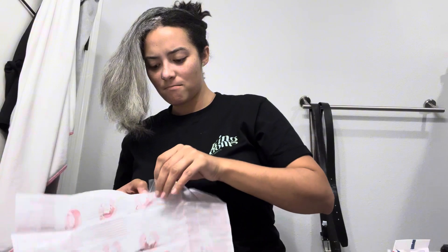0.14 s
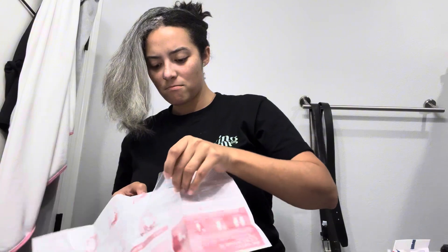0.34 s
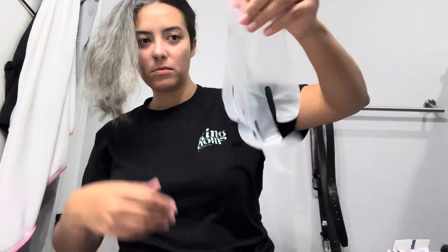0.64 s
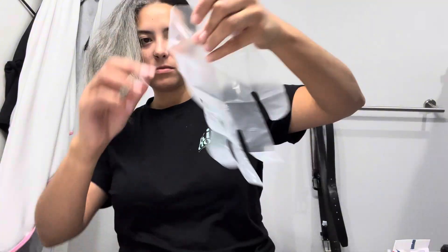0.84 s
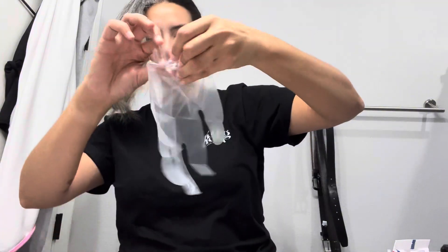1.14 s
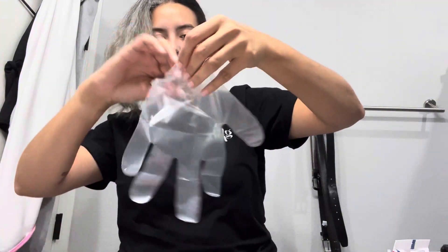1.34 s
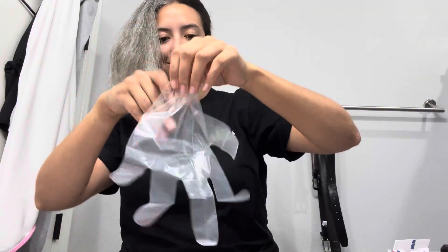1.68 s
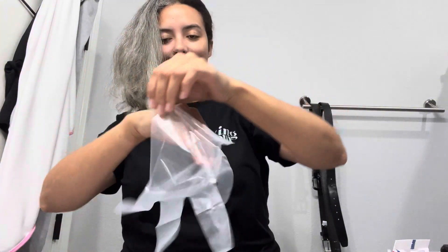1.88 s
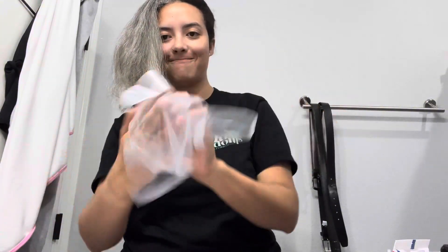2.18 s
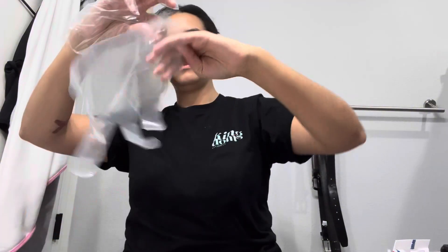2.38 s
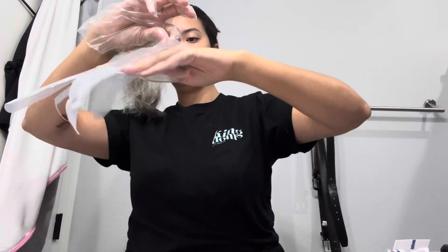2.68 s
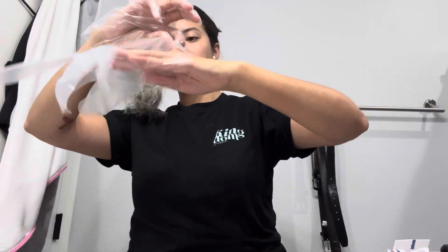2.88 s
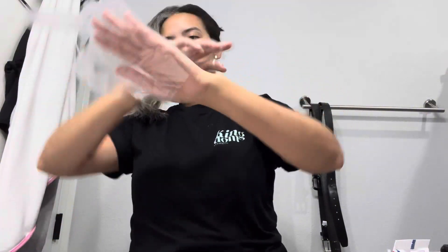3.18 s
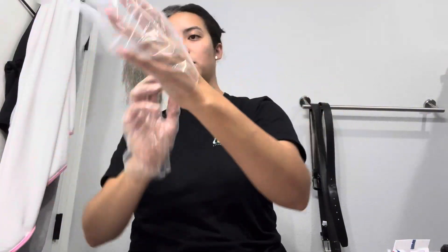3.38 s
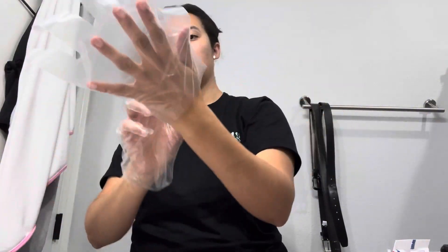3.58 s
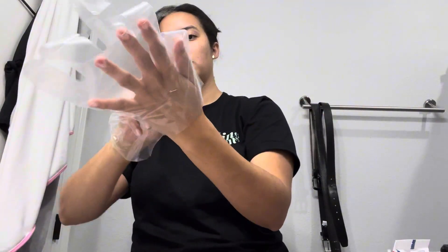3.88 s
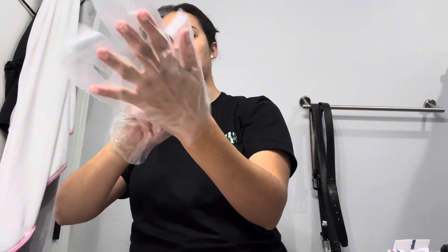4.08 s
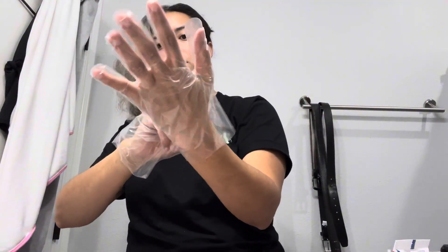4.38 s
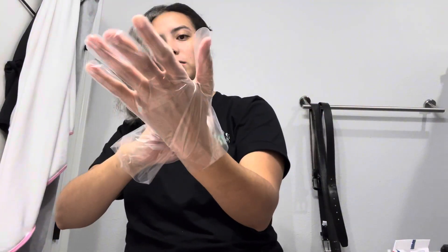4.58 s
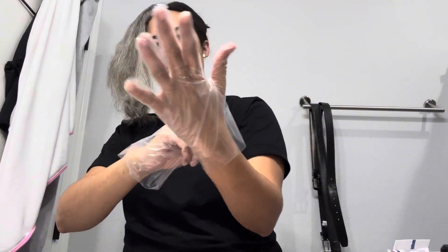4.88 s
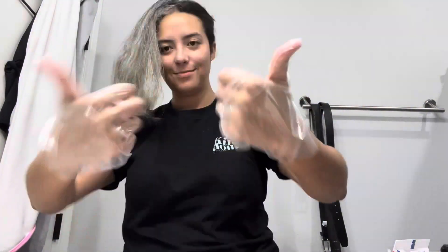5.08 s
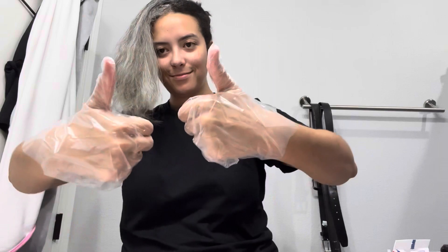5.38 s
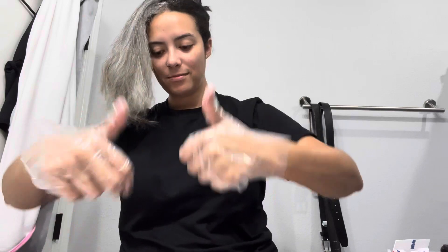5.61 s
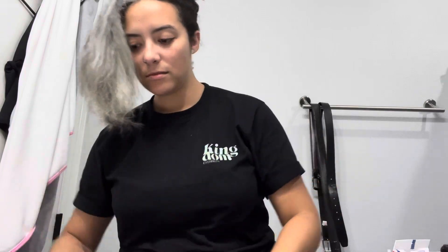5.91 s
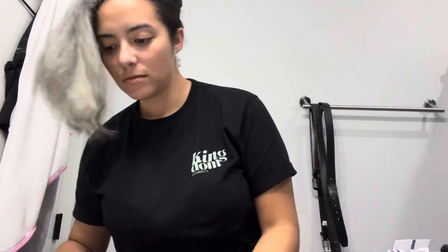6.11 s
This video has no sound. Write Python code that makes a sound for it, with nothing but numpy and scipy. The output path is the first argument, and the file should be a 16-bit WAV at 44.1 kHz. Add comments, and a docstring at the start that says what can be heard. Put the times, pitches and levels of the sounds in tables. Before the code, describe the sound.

In a small bathroom, close to the microphone, a folded paper leaflet is yanked open with loud, bright snaps and dull low flaps for just over half a second. Thin plastic gloves follow, much quieter, rustling and sizzling in uneven strokes with tiny clicks, thinning out near the end. A faint paper tap closes it. A low fan hum runs throughout.

```python
"""Paper crackles and snaps first: a folded leaflet is pulled open in a small bathroom.
Thin plastic gloves are then lifted off it and worked onto both hands, and the hands land on the paper again.
Creases buckle in swarms of tiny clicks that ring small facets; loud snaps are short bursts of slips.
The big sheet flaps as low noise and dull decaying sines, and wall echoes are decaying noise.
A ventilation fan hums throughout: unsteady sines over a dull rush of air."""
import sys
import numpy as np
from scipy import signal
from scipy.fft import rfft, irfft
from scipy.io import wavfile
from scipy.ndimage import uniform_filter1d

SR = 44100
rng = np.random.default_rng(int(sys.argv[2]) if len(sys.argv) > 2 else 0)


def to_wav(s):
    """Save 16-bit WAV."""
    ch = np.atleast_2d(s).T  # columns
    pcm = np.round(np.clip(ch, -1, 1) * 32767)  # PCM
    wavfile.write(sys.argv[1], SR, pcm.astype(np.int16))


N = 275625
TIME = np.arange(N) / SR

# Levels in the tables are starting points that the functions trim; colours are scaled to unit power.

# pulls that open the leaflet, then the hands landing on it again:
# [t/s, length/s, attack/s, crinkle level/dB, whole-sheet flexing level/dB]
PULLS = [(0.0, 0.26, 0.0045, -48, -43), (.078, 0.016, 0.012, -36.5, -37), (.16, 0.11, 0.0061, -41.5, -35),
         (.276, 0.09, 0.0026, -37, -34.5), (.365, 0.061, 0.0034, -33.5, -31.5),
         (.435, 0.073, 0.0068, -34.5, -33), (.568, 0.041, 0.0028, -44.5, -45),
         (6.175, 0.03, 0.025, -46, -40.5), (6.211, 0.014, 0.0051, -40.5, -35)]
# a pull slackens as the paper gives way, then dies out: the crinkle first, the flexing more slowly
PULL_SAG_DB_PER_S, PULL_RELEASE_DB_PER_S = 49, (228, 157)
# loud paper creases snapping through: [t/s, crack level/dB, tick level/dB]
PAPER_SNAPS = [(0.045, -38, -61), (0.102, -26, -32), (0.163, -29.5, -38), (0.174, -27.5, -45),
               (0.235, -29.5, -58), (0.277, -22, -31), (0.2845, -16.5, -22.5), (0.325, -23, -41),
               (0.3695, -16.5, -21), (0.437, -23, -35), (0.4788, -21.5, -31), (0.5712, -24.5, -23),
               (6.2115, -40, -34.5)]
# small stray paper snaps: [tries per s, crack and tick level/dB relative to the rustle, spread/dB]
PAPER_STRAYS = (89.5, -1.5, -3, 1)
# colour of the paper crinkle: [f/Hz, level/dB]
PAPER_COLOUR = [(300, -26), (700, 1), (1800, 5), (2500, 1.5), (3150, 7.5), (4100, 1.5), (5200, 7.5),
                (7800, 5), (11000, 1), (14200, 2), (16000, -10)]
# colour of a paper panel's crack: [f/Hz, level/dB]
PAPER_CRACK = [(900, -3), (1800, 5.5), (2500, 1), (3200, 6.5), (5000, -4), (7500, -32)]
# colour of the tick of a breaking crease, paper or film: [f/Hz, level/dB]
TICK = [(1500, -32), (4000, -3.5), (6000, 9), (9000, 12), (11300, 8)]
# broad colour of the flexing sheet: [f/Hz, level/dB]
SHEET_COLOUR = [(70, -4), (115, -2), (175, -7.5), (310, -3.5), (420, 2.5), (650, -4.5), (1500, -13),
                (13500, -28), (15000, -62)]
# soft puffs of air and bumps of the hands: [t/s, level/dB, f/Hz]
FLAPS = [(0.097, -33, 116), (0.27, -32.5, 220), (0.331, -32, 112), (0.466, -30, 104), (0.5, -31.5, 220),
         (0.505, -27, 97), (2.213, -31, 81.4), (2.772, -39, 81), (6.216, -33, 125), (6.232, -30.5, 275)]
# low modes of the room that the sheet excites: [f/Hz, width/Hz, level/dB]
ROOM_MODES = [(112, 7.5, 8.5), (172, 8.5, 8), (220, 8.1, 10.5), (255, 7, 4), (371, 5.1, 1),
              (463.6, 10.5, 3), (576, 14, 6), (674, 10, -6)]

# strokes of the hands that open the gloves and tug them on:
# [t/s, length/s, attack/s, crumpling level/dB, sliding-film sizzle level/dB]
STROKES = [(.78, 0.057, 0.014, -56, -54), (.988, 0.16, 0.017, -50, -44.5), (1.305, 0.49, 0.044, -49.5, -46),
           (1.71, 0.076, 0.039, -45.5, -40.5), (1.915, 0.22, 0.011, -50, -44),
           (2.155, 0.013, 0.0087, -43.5, -44.5), (2.34, 0.014, 0.014, -52, -50),
           (2.645, 0.27, 0.01, -57, -51.5), (2.895, 0.13, 0.036, -45.5, -39.5),
           (3.19, 0.14, 0.015, -53.5, -48), (3.468, 0.079, 0.023, -52.5, -49),
           (3.58, 0.18, 0.019, -58, -50.5), (3.79, 0.26, 0.068, -48, -43), (3.975, 0.15, 0.087, -45, -35),
           (4.2, 0.069, 0.017, -50.5, -41.5), (4.32, 0.23, 0.01, -55, -49),
           (4.755, 0.014, 0.005, -54.5, -49), (4.85, 0.067, 0.035, -55, -45.5),
           (5.025, 0.063, 0.012, -51, -41), (5.55, 0.3, 0.11, -55, -48), (5.81, 0.094, 0.015, -56.5, -47.5)]
# a stroke holds, then lets the film settle
STROKE_SAG_DB_PER_S, STROKE_RELEASE_DB_PER_S = 4.5, 149.5
# film stirring between strokes, nearly still while the hands pause: [t/s, level/dB]
STIRRING = [(.7, -59), (2.3, -53), (2.5, -58.5), (3.45, -58), (3.6, -57.5), (5.24, -58), (5.36, -71),
            (5.535, -67.5), (5.555, -58.5), (6.1, -58)]
STIR_SIZZLE_DB = 1.5  # sizzle of the stirring film above its crumpling
# faster sliding makes more buckles: rate before clumping at a given sizzle level, and exponent of the law
BUCKLES_PER_S, BUCKLES_AT_DB, BUCKLES_FOLLOW = 1250, -44.5, .8
# film drawn taut over the hands buckles less often: span in s, and share of the rate
TAUT_S, TAUT_SHARE = (4.3, 5.5), .22
# loud film creases snapping through: [t/s, crack level/dB, tick level/dB]
FILM_SNAPS = [(0.7215, -58, -43), (0.7444, -48, -54), (0.8062, -47.5, -45), (0.8673, -38, -38.5),
              (0.9135, -42, -45), (1.0816, -47, -32), (1.2008, -45, -35.5), (1.2679, -43, -38),
              (1.2993, -34, -33), (1.3544, -50, -41), (1.3607, -45, -48), (1.465, -44, -35),
              (1.6206, -42, -35.5), (1.6298, -52, -49), (1.6486, -42, -34), (1.6543, -59, -35),
              (1.6618, -40, -38), (1.7708, -32, -34), (1.9235, -37, -40), (2.0239, -36.5, -36),
              (2.0521, -36, -45), (2.1015, -53, -49), (2.1711, -34, -30), (2.2427, -59, -56),
              (2.2796, -43, -58), (2.3575, -42, -36.5), (2.5176, -60, -45), (2.5413, -54, -40.5),
              (2.647, -41, -42), (2.8119, -50, -41.5), (2.8997, -39, -33.5), (2.9376, -46, -45),
              (3.3739, -53, -40.5), (3.4712, -41, -43), (3.4919, -51, -37), (3.5245, -44, -41),
              (3.6256, -45, -57), (3.7056, -43, -37.5), (3.7373, -40.5, -42), (3.7907, -47, -34),
              (3.8116, -43, -36), (3.8925, -48, -48), (3.9329, -40, -43), (3.9992, -38, -31.5),
              (4.2496, -46, -35), (4.3369, -40, -34), (4.3492, -38.5, -35), (4.3741, -39, -38),
              (4.3981, -45, -36), (4.4415, -36.5, -42), (4.5001, -41, -38), (4.5153, -42, -31),
              (4.5218, -48, -39), (4.5377, -43, -33), (4.6238, -41, -35), (4.6615, -57, -46),
              (4.6719, -52, -42.5), (4.7273, -51, -39), (4.7317, -42.5, -38), (4.7373, -44, -37.5),
              (4.7934, -48, -51), (4.8054, -45, -33.5), (4.8565, -60, -44), (4.9366, -45, -36),
              (4.9503, -55, -34.5), (4.9827, -58, -37), (5.0049, -45, -36), (5.064, -48, -31),
              (5.1237, -42, -38), (5.1449, -49, -35), (5.1703, -54, -34.5), (5.2908, -56, -45.5),
              (5.3369, -57, -46.5), (5.4524, -68, -48), (5.5459, -60, -41.5), (5.5557, -49.5, -47),
              (5.8375, -44, -38), (5.8799, -48, -37), (5.9767, -63, -44), (6.0797, -65, -44)]
# small stray film snaps: [tries per s, crack and tick level/dB relative to the rustle, spread/dB]
FILM_STRAYS = (32, 3, -0.5, 2.2)
# colour of wide film folds crumpling: [f/Hz, level/dB]
CRUMPLE = [(150, 3.5), (480, 9), (750, -6), (1700, -1.5), (3300, -1), (5000, 2.5), (8000, 1.5),
           (16000, -33.5)]
# colour of tiny film wrinkles sizzling: [f/Hz, level/dB]
SIZZLE = [(1000, -16.5), (4000, -4.5), (6000, 1), (8700, 4.5), (13600, 4), (15500, -24.5)]
# colour of a film panel's crack, broader than the paper's: [f/Hz, level/dB]
FILM_CRACK = [(700, -3.5), (1800, 2), (4300, 3), (10000, -25.5)]

# bathroom decay, time to fall 60 dB: [f/Hz, t60/s]
ROOM_T60 = [(200, 1), (1000, 0.19), (4000, 0.16), (14000, 0.073)]
# tones of the fan: [f/Hz, rms level/dB]
FAN_TONES = [(59.15, -39), (83, -60), (111, -57), (138.6, -57.5), (361, -71.5)]
# colour of the fan's rush of air: [f/Hz, level/dB]
FAN_AIR = [(20, -17), (40, -5.5), (62, 3), (95, -0.5), (122, 4.5), (160, -3.5), (250, -6), (380, -13.5),
           (540, -15.5), (700, -31), (1150, -36.5), (2200, -32), (5000, -31), (15000, -75)]
# left-right likeness of diffuse noise as generated: [f/Hz, correlation from -1 to 1]
LIKENESS = [(60, 1), (240, 0.51), (480, -0.014), (950, -0.42), (1900, 0.2), (4000, -0.21), (6300, -0.89),
            (7800, 0.92), (10000, -0.24), (11500, 1)]
# the microphone pair: [f/Hz, phase by which left leads/rad]
PORT_PHASE = [(2000, 0), (3800, 0.5), (4400, -2), (5200, 1), (6000, 0.3), (6900, 4.5), (8300, 3.5),
              (10700, 5.5), (14600, 8.5)]
# the sound drops out for a moment: [t/s, time from start of drop to start of return/s]
DROPOUTS = [(0.688, 0.0033), (2.2815, 0.0051), (5.1251, 0.0025)]
CUTOFF_HZ = 15900


def leaflet(crinkling):
    """Stiff paper: a dense swarm of small creases buckling."""
    creases = crinkle(per_s=1500, spread_db=4.5, clump_db=3.5, facet_q=7.8, rub_db=-9.0)
    return from_db(-1.0) * colour(crinkling * creases, PAPER_COLOUR)


def snaps(rows, crack_colour, rise, hold, t60, after_db, after_t60, crack_db, tick_db, break_db,
          bounce_db=-11, bounce_s=.002, size=2048):
    """A crease clicks and slips, its panel shivers on, and the nearest surface throws the sound back."""
    lead = size // 8
    age = (np.arange(size) - lead) / SR - rise
    # a fast fall and a weaker, slower shiver, both after a short hold
    fall_db = -60 * np.maximum(age - hold, 0)
    decay = np.hypot(from_db(fall_db / t60), from_db(after_db + fall_db / after_t60))
    envelope = np.exp(np.minimum(age, 0) / rise) * decay
    level_window = .002 * SR  # a snap's level is its rms over 2 ms
    parts = np.zeros((2, N + size))
    for s, *levels_db in rows:
        start = int(np.clip(s * SR, 0, N))
        slips = rng.choice([-1, 1], size) * envelope
        # every crease rings a facet of its own pitch
        facet = resonate(slips, 5500 * 2 ** rng.random(), q=1.5)
        first_break = signal.unit_impulse(size, lead)
        burst = rms_one(slips) + 0.58 * rms_one(facet) + from_db(break_db) * rms_one(first_break)
        bounce_delay = int(bounce_s * SR * (.5 + rng.random()))
        burst = burst + from_db(bounce_db) * np.roll(burst, bounce_delay)
        snap = rms_one(burst) * np.sqrt(level_window / size)
        parts[:, start:start + size] += np.outer(from_db(levels_db), snap)
    crack, tick = parts[:, lead:lead + N]
    return from_db(crack_db) * colour(crack, crack_colour) + from_db(tick_db) * colour(tick, TICK)


def stray_snaps(crack_drive, tick_drive, per_s, crack_db, tick_db, spread_db, count=900):
    """Small creases give way at random, as strongly as the material is being moved."""
    s = np.cumsum(rng.exponential(1, count)) / per_s
    size_db = spread_db * np.clip(rng.standard_normal(count), -2, 2)
    crack, tick = (20 * np.log10(np.interp(s, TIME, drive) + 1e-9) + size_db
                   for drive in (crack_drive, tick_drive))
    heard = (s < TIME[-1]) & (tick > -90)
    return np.transpose([s, crack + crack_db, tick + tick_db])[heard]


def sheet(flexing):
    """The whole leaflet flutters and flaps, and sets the small room's low modes ringing."""
    noise = diffuse(N) + 0.77 * rng.standard_normal(N)
    flutter = colour(flexing * noise * from_db(3.6 * drift(60)), SHEET_COLOUR)
    air = from_db(-4.5) * flutter + flaps()
    ringing = sum(from_db(db) * resonate(air, hz, hz / width) for hz, width, db in ROOM_MODES)
    return (air + ringing) * from_db(0) * np.array(from_db([[.6], [-.6]]))


def flaps(t60=0.053, rise=0.002):
    """Each push of air is a few dull cycles: a sine with a quick rise and an exponential fall."""
    out = np.zeros(N)
    for s, peak_db, hz in FLAPS:
        age = np.clip(TIME - s, 0, 1)
        envelope = from_db(peak_db - 60 * age / t60) * (1 - np.exp(-age / rise))
        out += envelope * np.sin(2 * np.pi * hz * age)
    return from_db(2.5) * out


def gloves(crumpling, sliding):
    """Thin film: wide folds crumple, tiny wrinkles sizzle, and faster sliding buckles more often."""
    taut = (TIME > TAUT_S[0]) & (TIME < TAUT_S[1])
    speed = (sliding / from_db(BUCKLES_AT_DB)) ** BUCKLES_FOLLOW
    per_s = BUCKLES_PER_S * speed * np.where(taut, TAUT_SHARE, 1)
    folds = crinkle(per_s, spread_db=3.0, clump_db=8.0, facet_q=4.0, rub_db=-9.0)
    small = crinkle(per_s, spread_db=2.5, clump_db=7.5, facet_q=1.6, rub_db=-1.5)
    # a buckling fold also drags small wrinkles with it
    wrinkles = rms_one(0.42 * folds + small)
    crumple = from_db(-3.0) * colour(crumpling * folds, CRUMPLE)
    sizzle = from_db(-0.8) * colour(sliding * wrinkles, SIZZLE)
    return crumple + sizzle


def film_motion():
    """Strength of crumpling and of sliding: the strokes, over the film's light stirring."""
    strokes = gestures(STROKES, STROKE_SAG_DB_PER_S, STROKE_RELEASE_DB_PER_S)
    stirring = from_db(np.interp(TIME, *np.transpose(STIRRING))) * (TIME > STIRRING[0][0])
    return np.hypot(strokes, [stirring, from_db(STIR_SIZZLE_DB) * stirring])


def gestures(rows, sag_db_per_s, release_db_per_s):
    """Attack, sagging hold and release of every hand movement; one gain over time per level column."""
    power = 0
    for start, length, attack_s, *levels_db in rows:
        age = np.maximum(TIME - start, 0)
        fall_db = sag_db_per_s * age + np.outer(release_db_per_s, np.maximum(age - length, 0))
        attack = np.minimum(age / attack_s, 1)
        power = power + (from_db(levels_db)[:, None] * attack * from_db(-fall_db)) ** 2
    return np.sqrt(power)


def crinkle(per_s, spread_db, clump_db, facet_q, rub_db, count=14):
    """Buckles come in clumps; each is a click that rings one small facet. Rubbing hisses beneath."""
    born = rng.random(N) < per_s * from_db(clump_db * drift(140)) / SR
    sizes = from_db(spread_db * np.minimum(rng.exponential(1, N), 3.5))
    clicks = born * sizes * rng.choice([-1, 1], N)
    facet = rng.integers(0, count, N)
    facet_hz = np.geomspace(900, 15000, count)
    rings = sum(resonate(clicks * (facet == k), hz, facet_q) / np.sqrt(hz) for k, hz in enumerate(facet_hz))
    buckles = rms_one(rms_one(rings) + rms_one(clicks))
    swarm = buckles + from_db(rub_db) * rng.standard_normal(N)
    # the hand feeds in energy steadily, however it is shared among the buckles
    return swarm / np.sqrt(uniform_filter1d(swarm ** 2, size=1800) + 1e-9)


def bathroom(x, count=4):
    """Wall echoes, which change as the crinkles move about between the hands."""
    spots = np.array([drift(40) for _ in range(count)])
    spots /= np.linalg.norm(spots, axis=0)
    return sum(signal.oaconvolve((x * share)[None], wall_echoes(), axes=1)[:, :N] for share in spots)


def wall_echoes(first_echo_s=0.00183, size=17640):
    """The room's dense stereo tail from one spot; the treble dies first."""
    age = np.arange(size) / SR
    hz, noise = np.fft.rfftfreq(size, 1 / SR), rfft(diffuse(size))
    centres, t60s = np.transpose(ROOM_T60)
    tail = 0
    # overlapping bands, each with its own decay
    for share, t60 in zip(np.eye(len(t60s)), t60s):
        band = irfft(noise * at_hz(list(zip(centres, share)), hz), size)
        tail = tail + band * from_db(-60 * age / t60)
    return rms_one(tail * (age > first_echo_s)) / np.sqrt(size)


def fan(waver_db=.5, waver_rad=0.41):
    """Slightly unsteady motor tones over a dull rush of air."""
    tones = 0
    for hz, db in FAN_TONES:
        level = np.sqrt(2) * from_db(db + waver_db * drift(8.4))
        tones = tones + level * np.sin(2 * np.pi * hz * TIME + waver_rad * drift(1.69))
    air = from_db(-49.0) * colour(diffuse(N), FAN_AIR)
    return (tones + air) * from_db([[.9], [-.9]])  # a little louder on the left


def diffuse(size):
    """Stereo white noise whose left-right correlation varies with frequency, fully alike in the bass."""
    alike = np.clip(at_hz(LIKENESS, np.fft.rfftfreq(size, 1 / SR)), -1, 1)
    mid, side = rfft(rng.standard_normal((2, size)))
    return irfft(np.sqrt((1 + alike) / 2) * mid + np.sqrt((1 - alike) / 2) * side * [[1], [-1]], size)


def microphones(pair):
    """Sound reaches the two microphones out of step in the treble."""
    phase = at_hz(PORT_PHASE, np.fft.rfftfreq(N, 1 / SR))
    return np.array([pair[0], irfft(rfft(pair[1]) * np.exp(-1j * phase), N)])


def colour(x, spectrum, size=8192):
    """Causal (minimum-phase) filter with this spectrum; white noise keeps its power."""
    gain = rms_one(from_db(at_hz(spectrum, np.fft.rfftfreq(size, 1 / SR))))
    # folding the cepstrum forward in time gives the minimum-phase response
    cepstrum = irfft(np.log(gain))
    cepstrum[1:size // 2] *= 2
    cepstrum[size // 2 + 1:] = 0
    response = irfft(np.exp(rfft(cepstrum)))
    return np.apply_along_axis(signal.fftconvolve, -1, x, response)[..., :N]


def resonate(x, hz, q):
    """One resonance, gain 1 on top."""
    return signal.lfilter(*signal.iirpeak(min(hz, .4 * SR), max(q, 1), fs=SR), x + 1e-18)


def drift(rate):
    """Slow random wander: straight lines between normal random knots, rate knots per second."""
    knots = rng.standard_normal(4096)
    return np.interp(TIME * rate, np.arange(len(knots)), knots)


def at_hz(points, hz):
    """Read a table on a log-frequency axis."""
    f, value = np.transpose(points)
    return np.interp(np.log(np.maximum(hz, 1)), np.log(f), value)


def rms_one(x):
    """Scale to unit power."""
    return x / np.sqrt(np.mean(x ** 2) + 1e-20)


def from_db(db):
    """Decibels to gain."""
    return 10 ** (np.asarray(db) / 20)


def scene():
    """Paper and film in the room, over the fan; rustle spreads all round, snaps are heard more directly."""
    crinkling, flexing = gestures(PULLS, PULL_SAG_DB_PER_S, PULL_RELEASE_DB_PER_S)
    crumpling, sliding = film_motion()
    rustle = leaflet(crinkling) + gloves(crumpling, sliding)
    paper_rows = [*PAPER_SNAPS, *stray_snaps(crinkling, crinkling, *PAPER_STRAYS)]
    film_rows = [*FILM_SNAPS, *stray_snaps(crumpling, sliding, *FILM_STRAYS)]
    # rise, hold and decay times in s
    paper = snaps(paper_rows, PAPER_CRACK, rise=0.00083, hold=0.0035, t60=0.0033,
                  after_db=-15, after_t60=0.012, crack_db=-2.0, tick_db=1.5, break_db=-13)
    film = snaps(film_rows, FILM_CRACK, rise=0.0002, hold=0.00048, t60=0.0016,
                 after_db=-7, after_t60=0.011, crack_db=-1.5, tick_db=-0.5, break_db=-3.5)
    direct = from_db(-2.0) * rustle + paper + film
    echoes = bathroom(from_db(-1.6) * rustle + from_db(-2.1) * paper + from_db(-2.0) * film)
    handling = microphones(direct + echoes) * from_db([[-.4], [.4]])
    return handling + sheet(flexing) + fan()


def record(dry, fade_in_s=0.022, fade_out_s=0.00079):
    """Three brief dropouts to a faint remainder, each fading back in; the top is cut."""
    level = np.ones(N)
    for s, silent in DROPOUTS:
        fade_out = (s - TIME) / fade_out_s + 1
        fade_in = (TIME - s - silent) / fade_in_s
        level *= np.clip(np.maximum(fade_out, fade_in), .04, 1)
    low_pass = signal.ellip(10, .1, 80, CUTOFF_HZ, fs=SR, output="sos")
    return signal.sosfilt(low_pass, dry * level)


dry = scene()
out = record(dry)
to_wav(out)
```